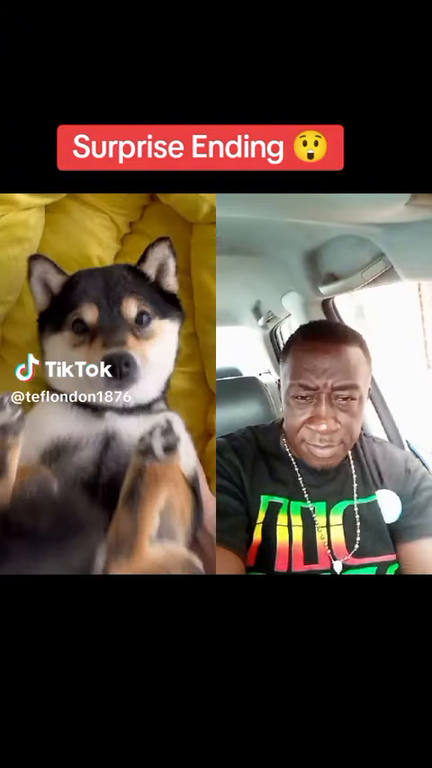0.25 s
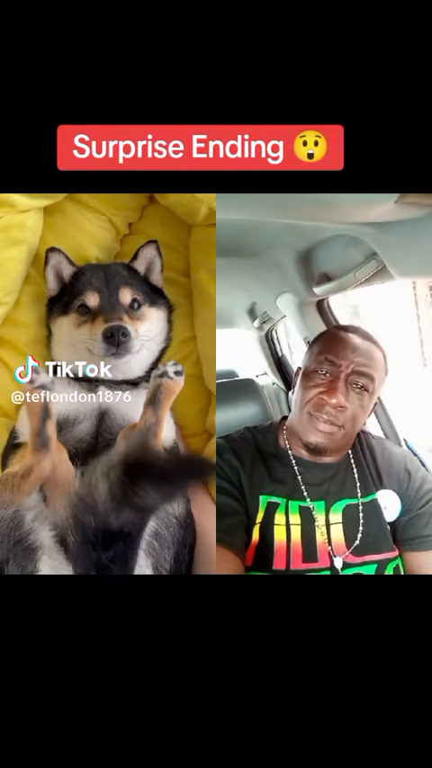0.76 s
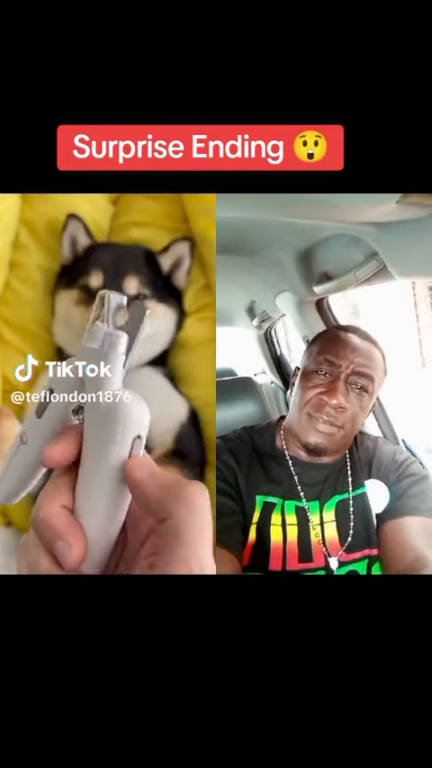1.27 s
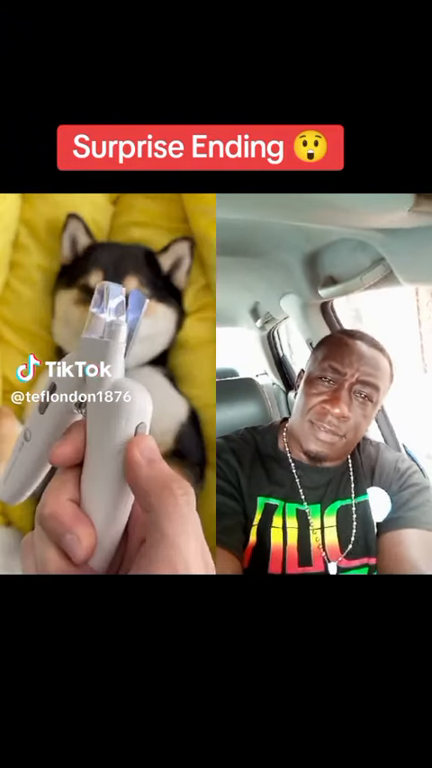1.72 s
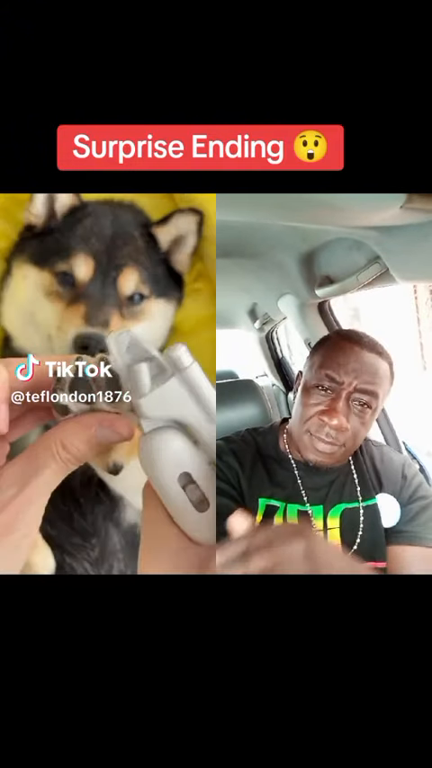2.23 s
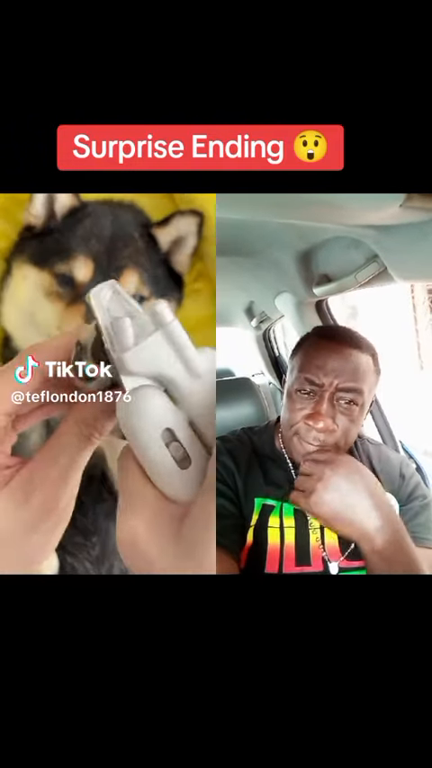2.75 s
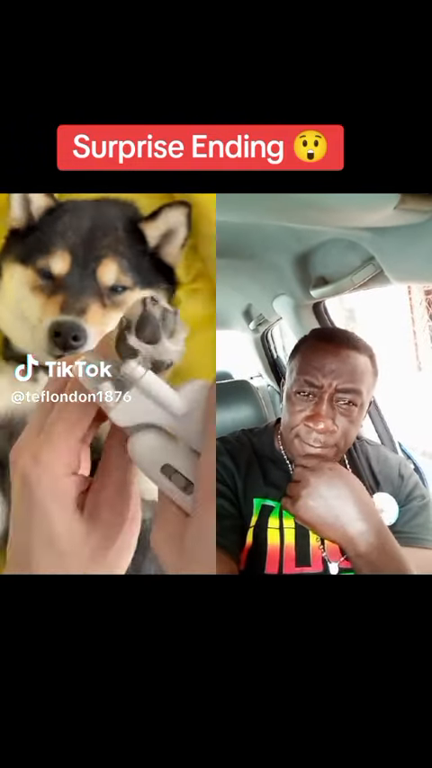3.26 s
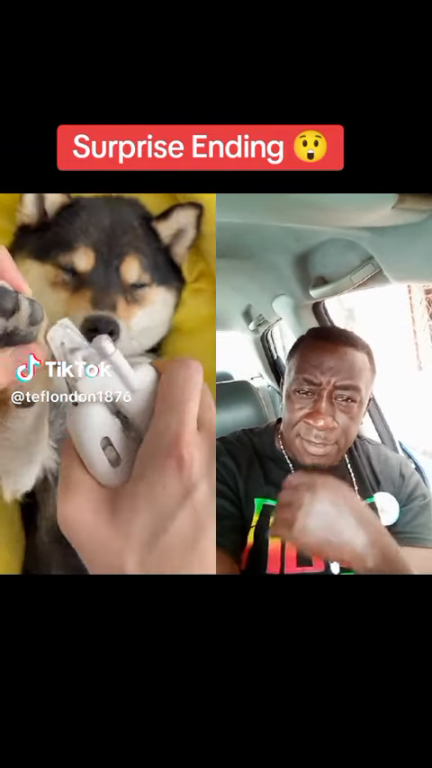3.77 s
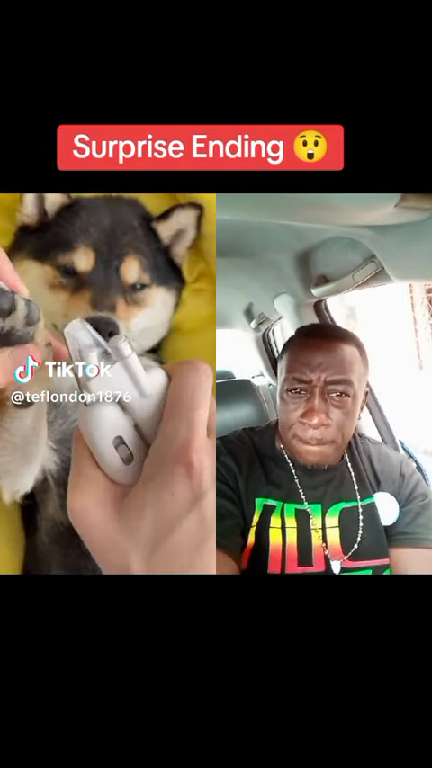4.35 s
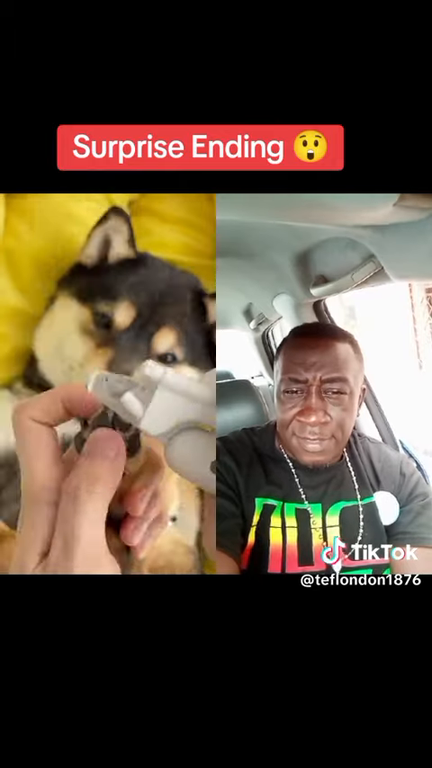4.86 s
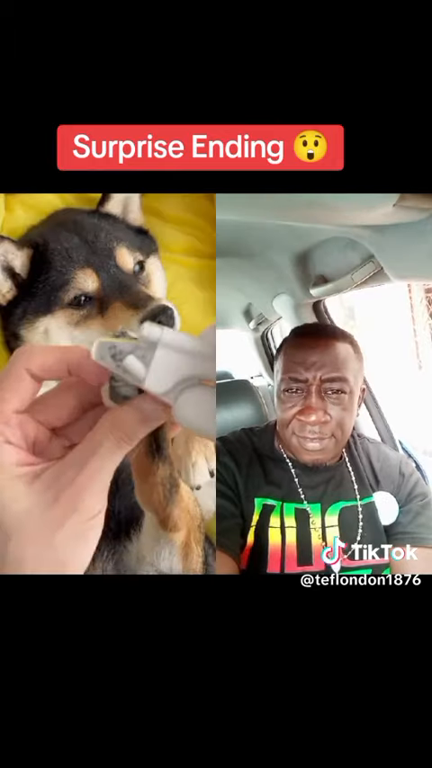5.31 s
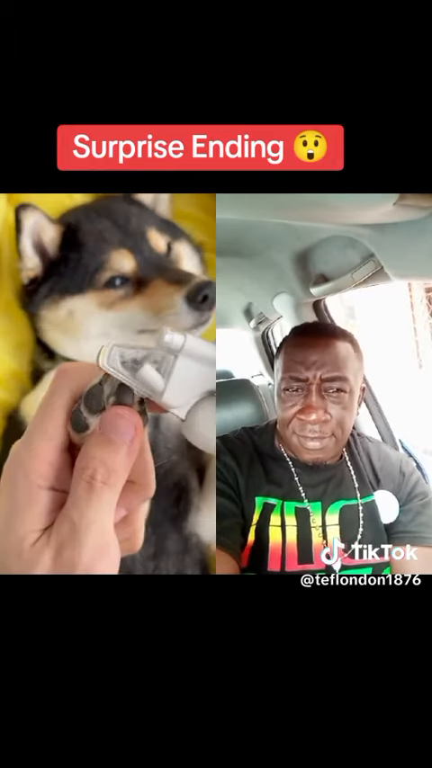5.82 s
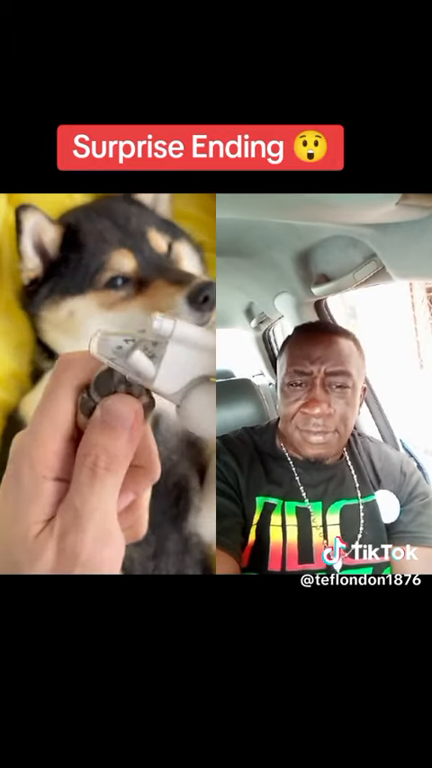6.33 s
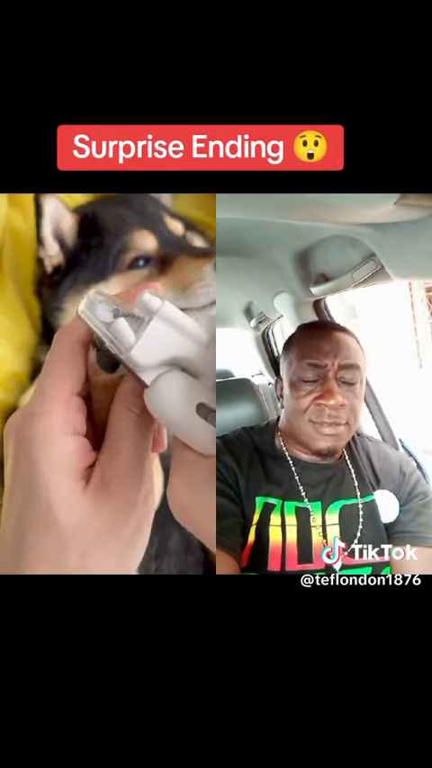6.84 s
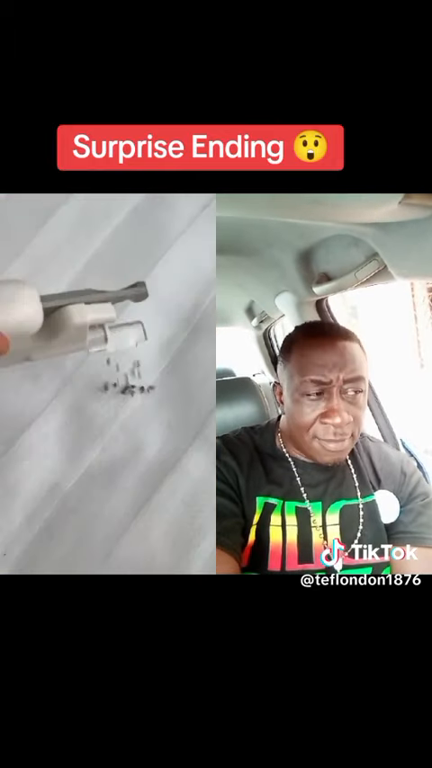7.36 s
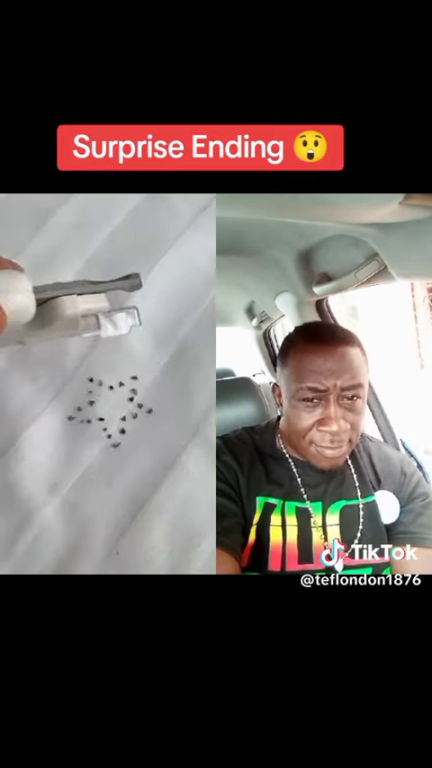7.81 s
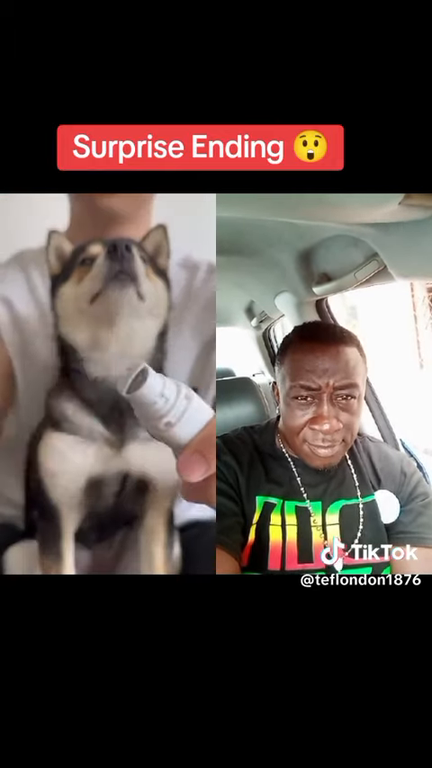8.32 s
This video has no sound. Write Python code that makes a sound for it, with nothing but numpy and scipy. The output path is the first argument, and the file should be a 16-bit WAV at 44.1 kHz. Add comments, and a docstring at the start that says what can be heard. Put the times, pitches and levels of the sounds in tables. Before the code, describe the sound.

Close on a small plastic pet nail clipper in a quiet room. A few soft, low hand bumps come first, then small clicks and scattered sharp snaps. The snaps settle into a run of about three a second, each with a short squeezing rub, a gritty bite and a brief boxy ring. After the last, faint clicks and a soft rustle, then a hollow plastic knock with a quick rebound and dull tail.

```python
"""Soft low thumps of handling over faint rumble and air; then a pet nail clipper snaps in runs,
about three times a second. Each snap is shaped noise: a swelling rub of the lever, then bite, grind and stop.
A ring of decaying noise, combed by a short echo, follows each snap; a few cuts also ring the handle.
Light clicks and a faint rustle follow, and a hollow knock of damped modes and noise ends the scene."""
import sys
import numpy as np
from scipy.fft import rfft, irfft, next_fast_len
from scipy.io import wavfile
from scipy.ndimage import uniform_filter1d, map_coordinates

SR = 44100
rng = np.random.default_rng(int(sys.argv[2]) if len(sys.argv) > 2 else 0)


def waveform_to_disk(signal):
    """Save audio, clipped to [-1, 1], as 16-bit WAV at the path in sys.argv[1]."""
    frames = np.transpose(np.atleast_2d(signal))
    scaled = np.clip(frames, -1, 1) * 32767
    samples = np.round(scaled).astype(np.int16)
    wavfile.write(sys.argv[1], SR, samples)


N = 378378
TIME = np.arange(N) / SR  # s

# Spectra of the background noises. Each row: frequency in Hz, relative level in dB.
RUMBLE_SPECTRUM = [(12, -39), (20, -7), (37, -6.5), (59, 1), (91, -5), (150, -2.5), (179, -8), (400, -21.5),
                   (520, -53), (880, -120)]
AIR_SPECTRUM = [(120, -24), (200, -5), (345, -13.5), (534, -10.5), (641, -13.5), (1090, -20), (2170, -23),
                (5590, -26.5), (8200, -31.5), (15500, -35)]
# Stereo width of the background. Each row: frequency in Hz, side over mid in dB.
BACKGROUND_WIDTH = [(60, -23), (200, -21), (700, -6.5), (3000, -16), (12000, -8.5)]
# Rumble before and after its step, less a constant offset. Each row: time in seconds, level in dB.
EARLY_RUMBLE = [(0.45, -52.5), (0.65, -58), (1.71, -55.5), (1.84, -67), (3.37, -54), (3.62, -61.5),
                (6.24, -58), (7.12, -67)]
LATE_RUMBLE = [(7.19, -43), (7.33, -46), (7.43, -36.5), (7.488, -52), (8.09, -46.5)]
RUMBLE_STEP_S = 7.16
EARLY_OFFSET_DB, LATE_OFFSET_DB, AIR_DB = 0.5, -0.5, -58.5

# Handling thumps. Each row: start in seconds, level in dB before a shared gain, pitch in Hz, t60 in seconds.
THUMP_EVENTS = [(0.027, -24.5, 83, 0.17), (0.047, -11.5, 77, 0.11), (.116, -16, 57, 0.17),
                (.212, -25, 54.3, 0.085), (0.245, -26, 72.4, 0.21), (0.326, -36, 88, 0.25),
                (.39, -33, 55.5, .15)]

# Spectra of the cut and its ring. Each row: frequency in Hz, relative level in dB.
SNAP_SPECTRUM = [(40, -16), (250, -13.5), (540, -15.5), (700, -7), (1100, -11.5), (1900, -3), (2800, 0.5),
                 (3900, -2), (5000, -2), (6300, -2), (6800, -7), (8300, -5.5), (11000, -15), (16000, -13)]
TAIL_SPECTRUM = [(60, -25), (380, -16), (680, -12.5), (1250, -12), (1700, -7.5), (2550, -1.5), (3300, -4.5),
                 (4700, -3), (6200, -2), (6700, -6), (7500, -2), (9000, -6), (12000, -11), (16000, -13)]
# Stereo width of the cut and its ring. Each row: frequency in Hz, side over mid in dB.
SNAP_STEREO = [(400, -20.5), (1000, -17), (2200, -28), (4500, -31.5), (8000, -24.5), (12000, -10)]
TAIL_STEREO = [(400, -7), (600, -8), (1000, 2), (2200, -2), (3300, -23.5), (5500, -22.5), (7500, -6),
               (12000, -3)]
# Housing resonances. Each row: frequency in Hz, width in Hz, gain in dB before random strength and depth.
HOUSING_MODES = [(660, 39, 3), (1110, 29, 5.5), (1550, 180, 2), (2164, 110, 2), (2645, 62, 1.5),
                 (3015, 110, 3.5), (3520, 99, 4.5), (4270, 520, 1), (4670, 110, 3.5), (5190, 61, 5.5),
                 (6182, 110, 5), (7720, 200, 2.5)]
# Comb of a short echo whose delay drifts. Each row: time in seconds, comb spacing in Hz.
COMB_SPACING = [(1.35, 632), (1.89, 524), (2.2, 532), (2.54, 787), (2.86, 788), (3.18, 882), (3.52, 894),
                (3.85, 791), (4.52, 696), (4.85, 702), (5.2, 663), (5.54, 662), (5.87, 590), (6.2, 590),
                (6.54, 528)]
# Strength of the short echo before its depth factor. Each row: time in seconds, strength from 0 to 1.
ECHO_STRENGTH = [(1.35, 0), (1.89, 0.7), (2.2, .22), (2.54, 0.98), (3.52, 0.88), (3.85, 0.74), (4.52, 0.63),
                 (5.87, 0.28), (6.54, 0.52), (7.36, .06)]

# Clicks of the lever and loose housing. Each row: start in seconds, level in dB, treble tilt in dB.
CLICK_EVENTS = [(0.667, -32, 17), (0.844, -28.5, 2), (0.881, -26, -9), (1.309, -40, 19), (1.356, -31, 14),
                (1.396, -35, 8), (1.866, -17, -18), (2.434, -29, -2), (2.569, -17.5, 2.5),
                (6.188, -12, -11), (6.5197, -5, -7), (7.3, -30.5, 8.5), (7.355, -33, -10),
                (7.369, -24.5, 23), (7.38, -23.5, -12)]
CLICK_S, CLICK_BASS_DB = 0.0032, -2
RUSTLE_AT_S, RUSTLE_S, RUSTLE_DB = 7.303, 0.12, -45.5

# Snaps of the clipper. Each row: start in seconds, level in dB, length of the cut in seconds, treble tilt in dB,
# bass tilt in dB, squeeze length in seconds, squeeze level in dB, tail level in dB before shared gain,
# tail t60 in seconds, tail bass tilt in dB.
SNAP_EVENTS = [(0.7128, -3, 0.0018, 2, -0.5, .037, -15, -20.5, 0.44, -2.5),
               (0.861, -12.5, 0.0085, -1.5, -2, 0.028, -32, -25.5, 0.2, 8),
               (1.3459, -5, .001, 16.5, -2.5, 0.0028, -26.5, -31.5, 0.26, 4),
               (1.884, -6.5, .014, 1, -3, 0.033, -18, -16, .36, -6.5),
               (2.2031, -5.5, 0.0059, -5.5, -1, .024, -29.5, -16.5, 0.49, -4.5),
               (2.538, -5, 0.012, -0.5, -0.5, .034, -28, -18.5, 0.34, -1.5),
               (2.858, -5, 0.012, -1.5, 1.5, 0.0094, -24.5, -16.5, 0.54, 3.5),
               (3.178, -4.5, 0.0085, 1, 2.5, 0.0053, -18, -15.7, .41, -1),
               (3.5225, -6, 0.0092, 4, -3.5, 0.015, -19, -17.5, .47, -0.5),
               (3.8497, -5, .011, 6.5, 2, 0.0077, -16.5, -15, .38, 0),
               (4.5216, -4, 0.018, -2.5, -3, .006, -26, -15, .42, 5.5),
               (4.8524, -5.5, 0.0089, -3, 0.5, 0.015, -14.5, -16.5, 0.41, 3),
               (5.1993, -5, .008, -6.5, -2.5, 0.01, -18, -18, 0.41, 3.5),
               (5.5414, -5.5, .012, -1, -2, 0.018, -22, -14.5, 0.39, 0.5),
               (5.866, -2, .011, -2.5, -9, 0.015, -25, -14, .39, 7),
               (6.196, -7, 0.016, -0.5, 0.5, 0.0096, -18.5, -15, .38, 1.5),
               (6.538, -6.5, 0.016, -1, 0, 0.03, -20, -16.5, 0.45, 5),
               (7.361, -18, 0.00097, 10, 19, .006, -38, -38, .2, 26)]
CONTACT_S, CONTACT_T60_S = 0.002, 0.012
BITE_DB, GRIND_DB, STOP_DB = -2.5, -4, -8  # relative to the snap
SQUEEZE_SWELL_DB = 10.5
# Tones of the hollow handle. Each row: start in seconds, level in dB, frequency in Hz, t60 in seconds.
HANDLE_TONES = [(0.863, -15, 1236, 0.032), (1.884, -11, 1088, 0.058), (6.197, -22, 1207, .06),
                (6.539, -19.5, 1005, .05)]

TAIL_RISE_S, TAIL_HOLD_S, TAIL_DB = 0.0062, 0.012, -1.52
TAIL_TREBLE_DB, TAIL_TREBLE_SHARE = -4.5, 0.45  # offset, and share of the snap's treble tilt
SHEEN_DB, SHEEN_LIFE = 1, 0.75  # treble gain, and its t60 as a share of the tail's
WOBBLE_DB, WOBBLE_S = 1, 0.012  # spread and spacing of random level points

# Blows of the hollow knock. Each row: start in seconds, level in dB, length in seconds.
KNOCK_BLOWS = [(8.125, -6, 0.0023), (8.136, -11.5, 0.0051), (8.145, -17.5, 0.0051)]
# Modes of the knocked case. Each row: frequency in Hz, relative level in dB, t60 in seconds.
CASE_MODES = [(108, -18, .13), (163, -1, 0.065), (247.5, -22, .04), (355, 0.5, 0.059), (747, 2.5, 0.027),
              (1160, 1.5, 0.035), (1326, -15, .035), (2300, -0.5, 0.05)]
# Spectra of the crack and its tail. Each row: frequency in Hz, relative level in dB.
KNOCK_SPECTRUM = [(40, -24.5), (100, -14.5), (350, -1.5), (560, -4), (750, -10), (1120, -4.5),
                  (1650, -12.5), (2280, -6), (3900, -12), (8000, -5.5), (10000, -11), (15500, -9)]
KNOCK_TAIL_SPECTRUM = [(80, -18), (150, -9), (370, -6.5), (640, -9.5), (1300, -10), (2450, -9.5),
                       (3000, -17.5), (5000, -20), (11500, -26), (15000, -34)]
# Stereo width of the knock. Each row: frequency in Hz, side over mid in dB.
KNOCK_STEREO = [(60, 2), (240, -11), (950, -3.5), (3770, -8.5), (15000, -3)]

BAND_LIMIT_HZ = 15900


def amp(db):
    """Definition of the decibel: 20 dB is a tenfold amplitude."""
    return 10 ** (np.asarray(db) / 20)


def unit(x):
    """Normalisation by root mean square, giving rms 1."""
    return x / np.sqrt(np.mean(x ** 2) + 1e-20)


def along(points, hz):
    """Interpolation of a spectrum on a logarithmic frequency axis."""
    f, v = np.transpose(points)
    return np.interp(np.log(hz + 1), np.log(f + 1), v)


def filtered(x, response):
    """Linear filtering: the spectrum is multiplied by a frequency response."""
    size = x.shape[-1]
    padded = next_fast_len(size + SR // 8)
    spectrum = rfft(x, padded) * response(np.fft.rfftfreq(padded, 1 / SR))
    return irfft(spectrum, padded)[..., :size]


def shelf(hz, corner_hz, db):
    """Shelving response: gain tends to db above the corner and to none below."""
    return amp(db / (1 + (corner_hz / (hz + 1)) ** 6))


def noise(spectrum, width, size, shape=lambda hz: 1):
    """Mid-side stereo: independent coloured noises are summed and differenced, then scaled to rms 1."""
    def gain(hz):
        mid_db = along(spectrum, hz)
        return shape(hz) * amp([mid_db, mid_db + along(width, hz)])
    mid, side = filtered(rng.standard_normal((2, size)), gain)
    return unit(np.array([mid + side, mid - side]))


def burst(t, length, rise, t60):
    """Forced then free response: exponential rise, hold for length, then decay of 60 dB per t60."""
    return (1 - np.exp(-t / rise)) * amp(-60 * np.maximum(t - length, 0) / t60)


def add(track, s, sound):
    """Superposition: a sound is summed into the track from time s."""
    start = max(round(s * SR), 0)
    track[:, start:start + sound.shape[-1]] += sound[..., :N - start]


def background():
    """Stationary noise: steady air, and low rumble whose slowly varying level steps up once."""
    early_db = np.interp(TIME, *np.transpose(EARLY_RUMBLE)) + EARLY_OFFSET_DB
    late_db = np.interp(TIME, *np.transpose(LATE_RUMBLE)) + LATE_OFFSET_DB
    rumble_db = np.where(TIME < RUMBLE_STEP_S, early_db, late_db)
    rumble = amp(rumble_db) * noise(RUMBLE_SPECTRUM, BACKGROUND_WIDTH, N)
    air = amp(AIR_DB) * noise(AIR_SPECTRUM, BACKGROUND_WIDTH, N)
    return rumble + air


def thumps():
    """Damped oscillation: each soft bump of the hand is a few low cycles with a weak upper partial."""
    out, t = np.zeros((2, N)), TIME[:SR // 3]
    for s, db, hz, t60 in THUMP_EVENTS:
        swing = np.sin(2 * np.pi * hz * t) * burst(t, 0, rise=0.0052, t60=t60)
        pat = np.sin(2 * np.pi * 2.85 * hz * t) * burst(t, 0, rise=0.0018, t60=0.07)
        add(out, s, -amp(db + 2.5) * (swing + amp(-18) * pat))
    return out


def tone(hz, treble_db, bass_db):
    """Contact stiffness: hard edges tilt the treble, the soft paw and hollow grip tilt the low body."""
    treble = shelf(hz, 6500, treble_db) * shelf(hz, 15000, -0.5 * treble_db)
    body = shelf(hz, 350, bass_db) * shelf(hz, 1400, -bass_db)
    return treble * body


def housing(hz, depth):
    """Modal excitation: every blow drives the housing's resonances at new random strengths."""
    strengths = 1.7 * rng.random(len(HOUSING_MODES))
    gain_db = 0
    for strength, (mode_hz, width_hz, db) in zip(strengths, HOUSING_MODES):
        gain_db = gain_db + strength * db / (1 + (2 * (hz - mode_hz) / width_hz) ** 2)
    return amp(depth * gain_db)


def near_echo(s, hz, depth):
    """Interference: a short echo combs the sound; its delay and strength drift between snaps."""
    comb_hz = np.interp(s, *np.transpose(COMB_SPACING))
    echo = np.interp(s, *np.transpose(ECHO_STRENGTH))
    strength = np.clip(echo * depth, 0, 0.9)
    # the echo loses treble; its delay is 1 / comb_hz
    delayed = strength / (1 + (hz / 7500) ** 6) * np.exp(-2j * np.pi * hz / comb_hz)
    comb = np.abs(1 + delayed) ** 1.7
    # the third peak of the comb is the strongest
    third_peak = amp(6 * strength / (1 + ((hz - 3 * comb_hz) / 130) ** 2))
    return comb * third_peak


def strike(t, lead, length, t60):
    """Impact envelope: a faint noise swells just before the hit, then a held burst dies."""
    lead_in = amp(-14) * np.exp(-np.abs(t - lead) / 0.002)
    return lead_in + burst(np.maximum(t - lead, 0), length, rise=0.00072, t60=t60)


def contact(s, length, treble_db, bass_db):
    """Impact noise: brief hard chatter excites the housing; returns its start time and sound."""
    t = TIME[:SR // 10]
    lead = 0.012  # s kept ahead of the hit for the lead-in
    shape = lambda hz: tone(hz, treble_db, bass_db) * housing(hz, depth=1.43) * near_echo(s, hz, depth=0.25)
    chatter = noise(SNAP_SPECTRUM, SNAP_STEREO, len(t), shape)
    return s - lead, chatter * strike(t, lead, length, t60=CONTACT_T60_S)


def rub(length, swell_db, treble_db, bass_db):
    """Stick-slip friction: uneven slips of plastic under the fingers swell to the end of the stroke."""
    t = TIME[:SR // 5]
    shape = lambda hz: tone(hz, treble_db, bass_db) * housing(hz, depth=0.93)
    scrape = noise(TAIL_SPECTRUM, SNAP_STEREO, len(t), shape)
    wander = unit(uniform_filter1d(rng.standard_normal(len(t)), size=100))
    slips = unit(amp(4 * wander))
    swell = amp(swell_db * (np.minimum(t / length, 1) - 1))
    return scrape * slips * swell * burst(t, length, rise=0.0054, t60=length)


def handling():
    """Impact and friction: single clicks of the lever and loose housing, and a faint rustle of fingers."""
    out = np.zeros((2, N))
    for s, db, treble_db in CLICK_EVENTS:
        start, chatter = contact(s, CLICK_S, treble_db, CLICK_BASS_DB)
        add(out, start, amp(db) * chatter)
    rustle = rub(RUSTLE_S, swell_db=1, treble_db=-10, bass_db=11)
    add(out, RUSTLE_AT_S, amp(RUSTLE_DB) * rustle)
    return out


def clipper():
    """Successive contacts: lever squeeze, blade bite, grind and stop; some cuts ring the hollow handle."""
    out, t = np.zeros((2, N)), TIME[:SR // 7]
    for s, db, cut_s, treble_db, bass_db, squeeze_s, squeeze_db, *_ in SNAP_EVENTS:
        squeeze = rub(squeeze_s, SQUEEZE_SWELL_DB, treble_db=-9, bass_db=1.5)
        add(out, s - squeeze_s, amp(squeeze_db) * squeeze)
        touch_s = min(CONTACT_S, cut_s)
        stop_at = s + max(cut_s - CONTACT_S, 0)
        parts = [(s, touch_s, BITE_DB), (s, cut_s, GRIND_DB), (stop_at, touch_s, STOP_DB)]
        for at, length, part_db in parts:
            start, chatter = contact(at, length, treble_db, bass_db)
            add(out, start, amp(db + part_db) * chatter)
    for s, db, hz, t60 in HANDLE_TONES:
        ring = np.sin(2 * np.pi * hz * t) * burst(t, 0, rise=0.0013, t60=t60)
        add(out, s, amp(db) * ring)
    return out


def tails():
    """Frequency-dependent damping: a dense ring follows each snap, and its treble dies sooner."""
    out, t = np.zeros((2, N)), TIME[:SR * 6 // 10]
    for s, _, _, treble_db, _, _, _, db, t60, bass_db in SNAP_EVENTS:
        tail_treble_db = TAIL_TREBLE_DB + TAIL_TREBLE_SHARE * treble_db
        colour = lambda hz: tone(hz, tail_treble_db, bass_db)
        shape = lambda hz: colour(hz) * housing(hz, depth=0.2) * near_echo(s, hz, depth=0.59)
        ring = noise(TAIL_SPECTRUM, TAIL_STEREO, len(t), shape)
        treble = filtered(ring, lambda hz: 1 - shelf(hz, 8700, -39.5))
        body = (ring - treble) * burst(t, TAIL_HOLD_S, rise=TAIL_RISE_S, t60=t60)
        sheen = amp(SHEEN_DB) * treble * burst(t, TAIL_HOLD_S, rise=0.0032, t60=t60 * SHEEN_LIFE)
        # the level of the ring wobbles at random as it dies
        wobble = map_coordinates(rng.standard_normal(256), [t / WOBBLE_S], mode="mirror")
        add(out, s, amp(db + TAIL_DB + WOBBLE_DB * wobble) * (body + sheen))
    return out


def knock():
    """Modal synthesis: a hollow plastic case is struck and rebounds; a long dull noise tail follows."""
    out, t = np.zeros((2, N)), TIME[:SR // 2]
    lead = 0.015  # s kept ahead of each blow for the lead-in
    for s, db, length in KNOCK_BLOWS:
        crack = noise(KNOCK_SPECTRUM, KNOCK_STEREO, len(t)) * strike(t, lead, length, t60=0.022)
        hollow = sum(amp(level - 60 * t / t60) * np.sin(2 * np.pi * hz * t) for hz, level, t60 in CASE_MODES)
        add(out, s - lead, amp(db) * crack)
        add(out, s, amp(db - 13.5) * hollow)
    tail = noise(KNOCK_TAIL_SPECTRUM, KNOCK_STEREO, len(t))
    dull = filtered(tail, lambda hz: shelf(hz, 4700, -35))
    bright = tail - dull
    add(out, 8.13, amp(-33.5) * dull * burst(t, 0, rise=0.011, t60=1.08))
    add(out, 8.13, amp(-23) * bright * burst(t, 0, rise=0.0091, t60=0.58))
    return out * amp([[0.6], [-0.6]])  # slightly louder in the first channel


def scene():
    """Superposition of all sources at the microphone."""
    return background() + thumps() + handling() + clipper() + tails() + knock()


def record(dry):
    """Saturation and band limiting: the hardest contacts overload the recorder, then a steep low-pass acts."""
    clipped = dry / (1 + np.abs(dry / 0.98) ** 12) ** (1 / 12)
    return filtered(clipped, lambda hz: 1 / (1 + (hz / BAND_LIMIT_HZ) ** 160))


dry = scene()
out = record(dry)
waveform_to_disk(out)
```